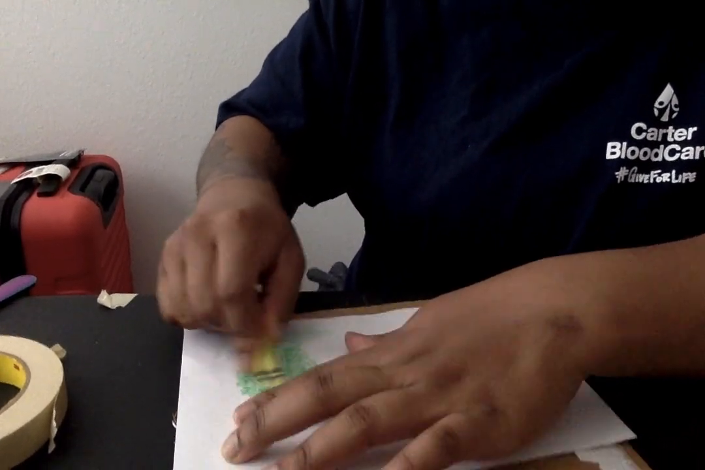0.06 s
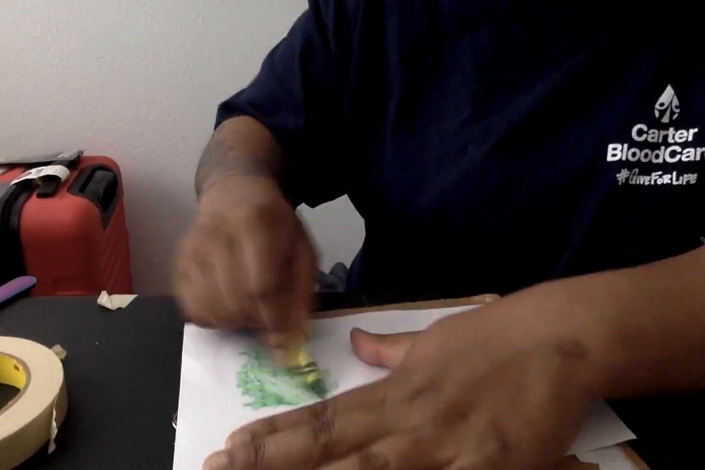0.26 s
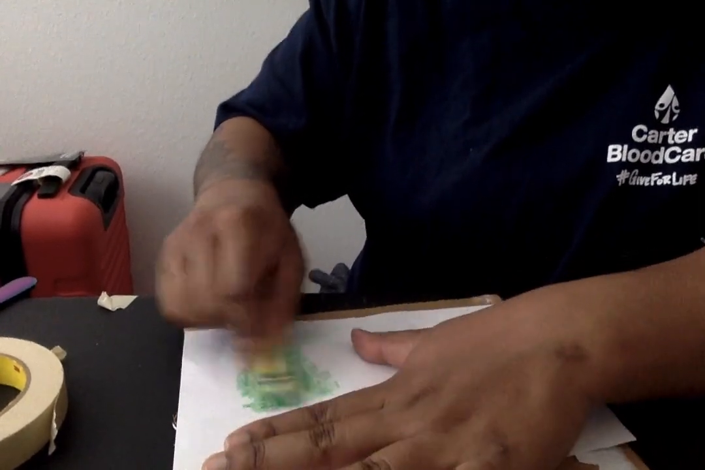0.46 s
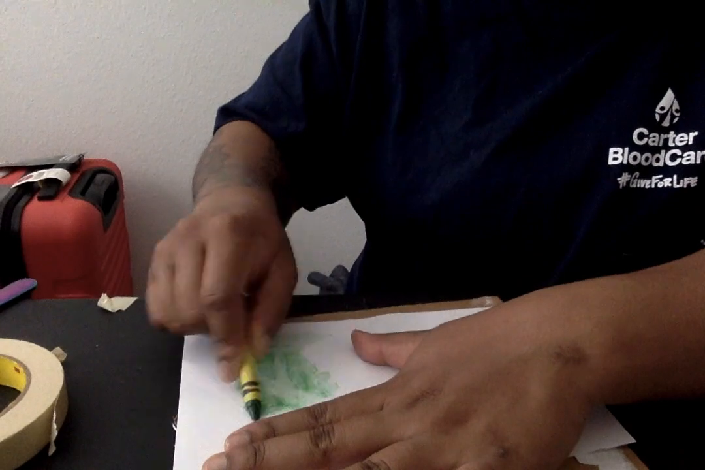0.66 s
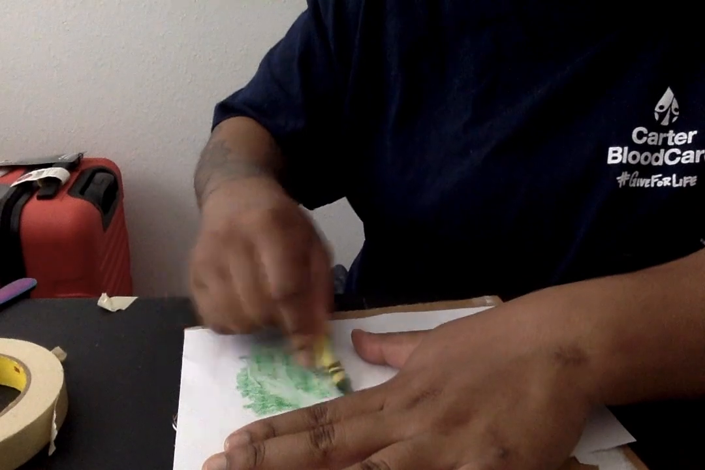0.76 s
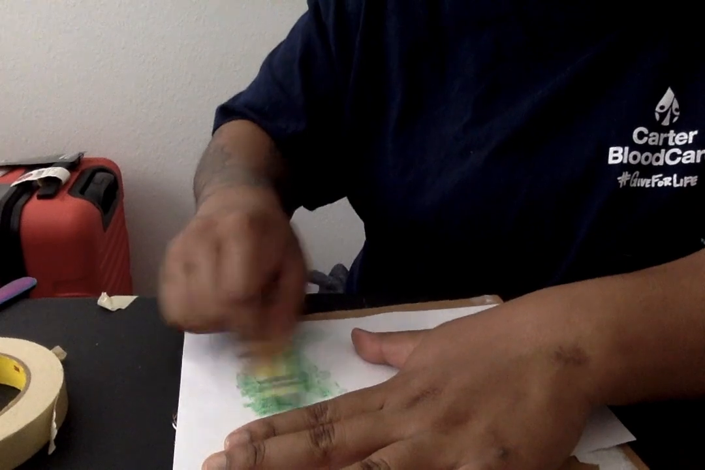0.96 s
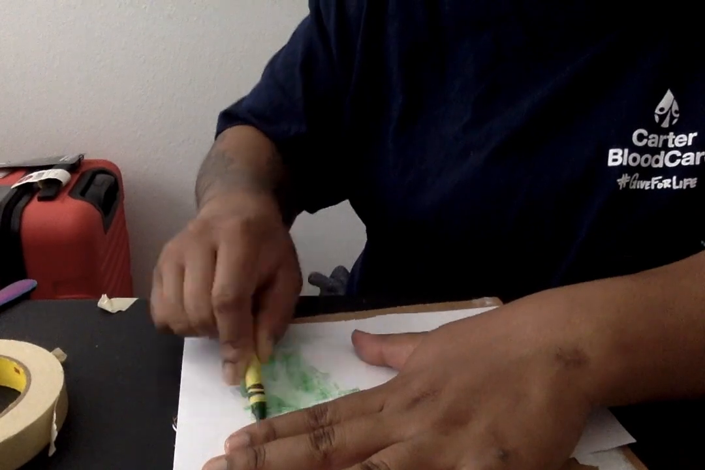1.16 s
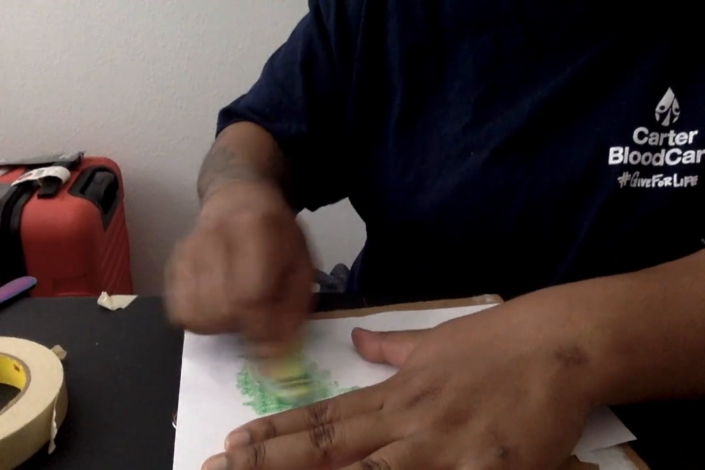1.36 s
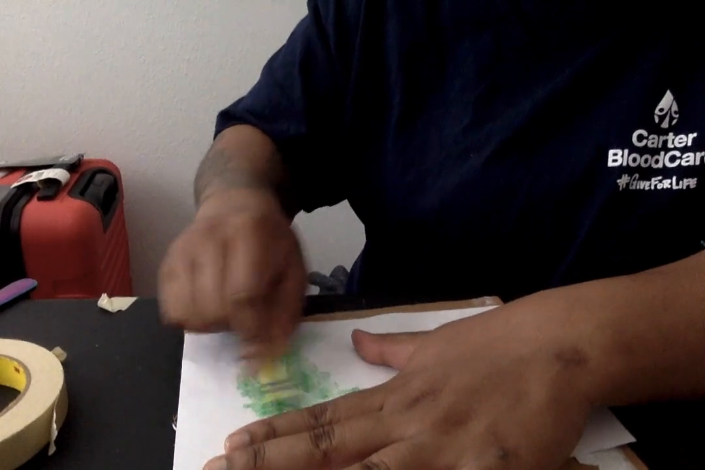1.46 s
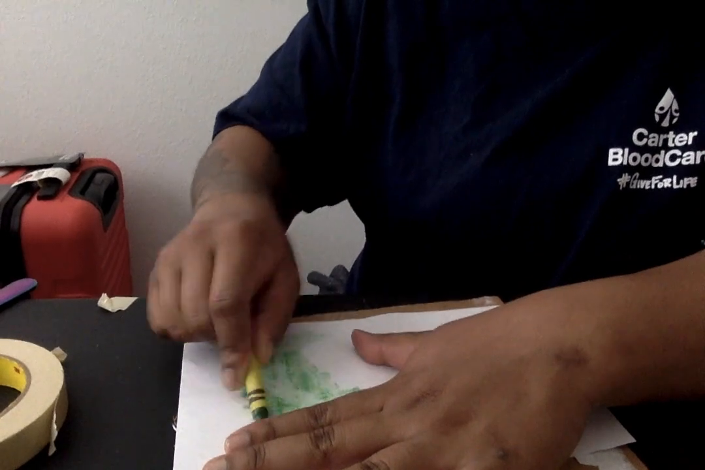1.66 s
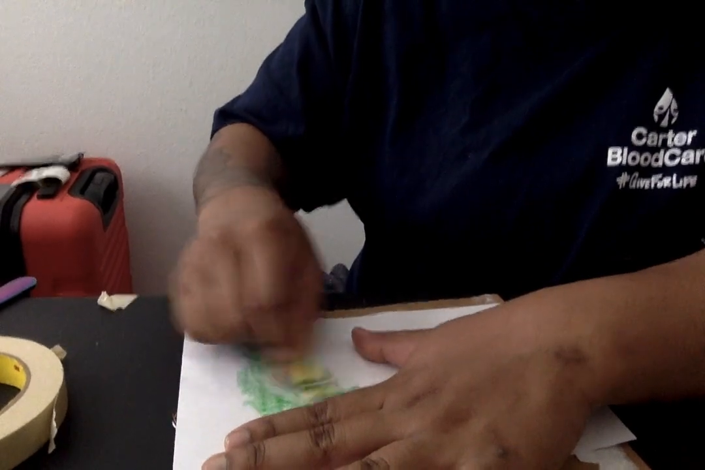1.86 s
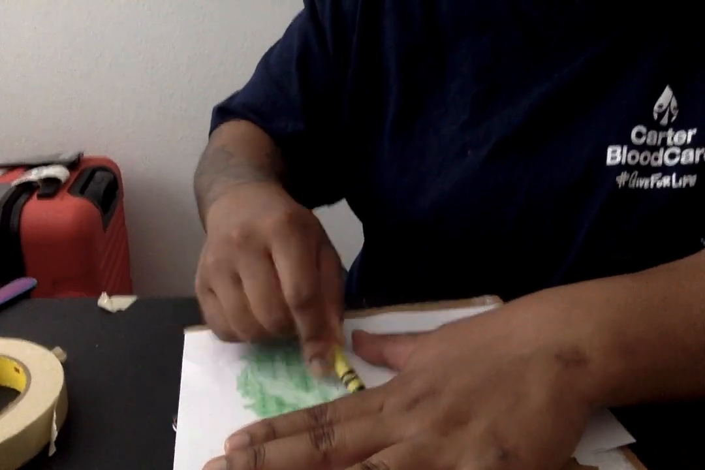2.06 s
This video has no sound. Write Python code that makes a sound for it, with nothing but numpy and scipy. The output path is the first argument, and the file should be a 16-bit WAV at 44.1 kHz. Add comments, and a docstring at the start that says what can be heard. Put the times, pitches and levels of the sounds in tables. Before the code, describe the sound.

A crayon scribbles rapidly on paper, close to the microphone in a small quiet room. First a hand slides over the sheet and lands with a soft thud, then scratchy strokes follow with hollow knocks and faint crackles.

```python
"""In a small quiet room, close to the microphone, a hand shifts over a sheet of paper and lands on the table.
A crayon then scribbles back and forth, eight strokes a second. Wax catches on the grain of the paper,
and this stick-slip friction hisses, rasps and makes the table rumble. The board under the sheet gives
hollow knocks as the pressure shifts, and the sheet crackles."""
import sys
import numpy as np
from scipy import signal
from scipy.fft import rfft, irfft
from scipy.io import wavfile
from scipy.ndimage import uniform_filter1d

SR = 44100
rng = np.random.default_rng(int(sys.argv[2]) if len(sys.argv) > 2 else 0)


def log_audio(samples):
    """Write samples as a 16-bit WAV file to the path given in sys.argv[1]."""
    # one column per channel
    frames = np.atleast_2d(samples).T
    # limit to full scale, then quantise
    limited = np.clip(frames, -1, 1)
    pcm = np.round(limited * 32767).astype(np.int16)
    wavfile.write(sys.argv[1], SR, pcm)


N = 92610
T = np.arange(N) / SR

# Crayon strokes, each lasting until the next turn: start_s, rasp_db, scrape_db
CRAYON_STROKES = [(0.336, -69.5, -69), (0.467, -72, -62), (0.585, -74.5, -67), (0.711, -71, -59),
                  (0.83, -77, -71), (0.97, -71, -54), (1.094, -70.5, -61.5), (1.224, -74, -55),
                  (1.348, -68, -67.5), (1.48, -65, -50.5), (1.603, -65.5, -54.5), (1.735, -69, -58.5),
                  (1.864, -73.5, -64), (1.991, -71.5, -60)]
# Knocks of the board on the table: start_s, note_db, pitch_hz, clack_db
BOARD_KNOCKS = [(0.194, -46, 234, -42), (.219, -30, 231.5, -31), (0.267, -42, 180, -46),
                (0.29, -43, 177, -79), (0.317, -49.5, 144, -110), (0.386, -40, 206.8, -42),
                (.412, -42, 171.5, -53), (0.519, -47.5, 135.5, -60.5), (.743, -48.5, 164, -54),
                (0.783, -47.5, 245, -54), (.865, -48.5, 240, -60), (0.919, -49.5, 164, -66),
                (1, -60, 255, -49), (1.027, -49, 270, -48.5), (1.048, -38.5, 230, -43.5),
                (1.131, -39, 158.6, -46), (1.176, -39, 168, -47), (1.257, -42, 239, -62),
                (1.295, -38.5, 191, -43), (1.382, -38, 172, -67), (1.422, -44.5, 174, -57),
                (1.507, -50, 249, -61), (1.527, -48, 259, -48), (1.548, -36.5, 197.6, -50),
                (1.637, -34.5, 185.4, -38.5), (1.684, -40.5, 167, -59), (1.801, -46, 234, -55.5),
                (1.951, -55, 173, -68.5), (2.029, -55.5, 237, -75), (2.042, -58, 255, -49)]
# Slides of the hand: start_s, peak_s, end_s, swish_db, rasp_db, scrape_db, rumble_db, swish_pitch_ratio
HAND_SLIDES = [(-.03, 0.026, 0.13, -59, -62, -80, -56, 1.07),
               (0.103, 0.14, 0.14, -66, -53, -44.5, -40.5, 1.07),
               (0.127, 0.157, 0.23, -80, -65.5, -58, -43, 0.96),
               (.208, 0.219, 0.287, -62.5, -64.5, -47, -45, 1),
               (.236, 0.288, 0.3217, -56, -62, -57, -45, 0.993)]
# Crackles of the sheet: start_s, level_db, pitch_hz, relative_treble_db
SHEET_CRACKLES = [(0.041, -48, 2100, -37), (0.1139, -42, 1940, -4), (.120, -47, 2550, -26),
                  (.386, -54, 2300, -13), (1.025, -59, 2280, -34), (1.277, -53, 2400, -35),
                  (1.303, -60, 2570, -20), (1.3846, -49.5, 2700, -23), (1.400, -52.5, 2500, -38),
                  (1.526, -48, 2780, -46), (1.628, -50, 2200, -37), (1.638, -52.5, 2700, -20),
                  (1.810, -52, 2600, -28), (1.826, -55.5, 2340, -44), (1.844, -64, 2400, -43),
                  (1.903, -59.5, 3300, -14), (2.066, -47, 2570, -45)]
# Modes of the board and table: frequency_hz, gain_db, t60_s
TABLE_MODES = [(138, -10, 0.59), (166, 0, 0.12), (210, -4, 0.024), (248.8, 5.5, 0.079), (302, -6.5, 0.12),
               (364.6, -4, 0.046), (497, -12.5, 0.051), (532, -9.5, 0.026), (705, -12.5, 0.032),
               (826, -8, 0.024), (926, -30, 0.034), (1252, -21, 0.051)]
# Modes of the sheet: frequency_hz, gain_db, t60_s
SHEET_MODES = [(2002, -1, 0.01), (2421, -5, 0.025), (2590, 7.5, 0.0032), (2975, -0.5, 0.011),
               (3530, -5, .014), (3927, 1.5, 0.013)]
# Spectrum of wax hissing on fine grain: frequency_hz, gain_db
HISS_SPECTRUM = [(500, -15), (2500, 13.5), (4500, 4.5), (6200, 4), (7300, -9.5), (10000, 1), (14500, -5),
                 (16000, -0.5)]
# Spectrum of the rasp on coarse grain: frequency_hz, gain_db
RASP_SPECTRUM = [(400, 1.5), (1400, -1.5), (1950, 6.5), (2500, 11.5), (3100, 1.5), (4000, 3.5), (4700, -12),
                 (8000, -18)]
# Spectrum of the board's hollow scrape: frequency_hz, gain_db
SCRAPE_SPECTRUM = [(150, -17), (330, -3.5), (530, 9.5), (700, -5.5), (900, -0.5), (1100, -3.5), (1400, -23),
                   (3000, -38)]
# Spectrum of the paper's high swish: frequency_hz, gain_db
SWISH_SPECTRUM = [(2000, -101), (4000, -2), (6000, -12.5), (8000, -13.5), (10600, -7.5), (12000, 4),
                  (15000, 2), (16500, -76)]
# Spectrum of the room's background noise: frequency_hz, gain_db
AIR_SPECTRUM = [(30, -82), (70, 16), (140, 0), (250, 4.5), (450, -32), (1500, -12), (2500, -10.5),
                (7000, -19), (15000, -21.5)]

SLIPS_PER_S, SLIP_SPREAD_DB = 1400, 7


def crayon(last_turn_s=2.135, hiss_db=-73, rumble_over_scrape_db=7):
    """Friction noise grows as a power of sliding speed, which falls to zero at every turn."""
    starts, rasp_db, scrape_db = np.array(CRAYON_STROKES).T
    progress = np.interp(T, np.append(starts, last_turn_s), np.arange(len(starts) + 1))
    phase = progress % 1
    speed = np.abs(np.sin(np.pi * phase ** 0.78))  # skewed to peak before mid-stroke
    bite = np.abs(np.sin(np.pi * phase ** 0.81))
    drag = speed ** 1.61
    midpoints = np.arange(len(starts)) + .5
    rasp = undb(np.interp(progress, midpoints, rasp_db))
    scrape = undb(np.interp(progress, midpoints, scrape_db))
    rumble = undb(rumble_over_scrape_db) * scrape * drag
    return friction(HISS_SPECTRUM, undb(hiss_db) * drag, rasp * speed ** 2.3, scrape * bite ** 2.3, rumble)


def friction(hiss_spectrum, hiss, rasp, scrape, rumble):
    """Stick-slip friction: fine grains hiss, coarse ones rasp, and slips drive the board and table."""
    fine = moving_contact(colour(catches(per_s=5800, spread_db=2), hiss_spectrum))
    coarse = moving_contact(colour(catches(per_s=550, spread_db=2), RASP_SPECTRUM))
    slips = catches(SLIPS_PER_S, SLIP_SPREAD_DB)
    board = moving_contact(colour(slips, SCRAPE_SPECTRUM))
    table = unit(ring(slips, TABLE_MODES))
    return hiss * fine + rasp * coarse + scrape * board + rumble * table


def catches(per_s, spread_db):
    """Shot noise: tiny independent catches form a train of impulses of random sign and strength."""
    strength = np.minimum(rng.exponential(size=N), 2.5)
    caught = rng.random(N) < per_s / SR
    return unit(caught * rng.choice([-1, 1], N) * undb(spread_db * strength))


def moving_contact(x, depth_db=2.6, width_hz=260, span_s=.03):
    """A time-varying filter: the sheet's resonances shift as the point of contact travels over it."""
    size, hop = 512, 128
    _, _, spectra = signal.stft(x, nperseg=size, noverlap=size - hop)
    ripple = rng.standard_normal(spectra.shape)
    ripple = uniform_filter1d(ripple, round(width_hz * size / SR), axis=0)
    ripple = uniform_filter1d(ripple, round(span_s * SR / hop), axis=1)
    _, shifted = signal.istft(spectra * undb(depth_db * unit(ripple)), nperseg=size, noverlap=size - hop)
    return unit(shifted[:N])


def knocks(flex_lead_s=0.001975, shortest_contact_s=0.00047, hardening=0.24):
    """Hertzian impact: the board flexes, then hits the table; weak contacts last longer and are duller."""
    out, t = np.zeros(N), T[:SR // 5]
    low_cut = signal.butter(3, 246, "high", fs=SR, output="sos")
    hardest_db = max(row[3] for row in BOARD_KNOCKS)
    for start, note_db, hz, clack_db in BOARD_KNOCKS:
        contact_s = shortest_contact_s / undb(clack_db - hardest_db) ** hardening
        age = t / contact_s
        force = signal.sosfilt(low_cut, age ** 2 * np.exp(-2 * age))
        add(out, start - flex_lead_s, burst(board_flex(hz, swell_s=0.005), note_db))
        add(out, start, burst(ring(np.gradient(force), TABLE_MODES), clack_db))
    return out


def board_flex(hz, swell_s, overtone_ratio=1.836, overtone_db=-11, overtone_swell_s=0.0037):
    """Damped bending: a hollow note, set by where the board is pressed, and its overtone swell and die."""
    def partial(frequency, peak_s):
        return np.sin(2 * np.pi * frequency * T) * T / peak_s * np.exp(-T / peak_s)
    return partial(hz, swell_s) + undb(overtone_db) * partial(hz * overtone_ratio, overtone_swell_s)


def hand(landing_s=.114, thud_db=-29.5):
    """Sliding friction makes the hand swish; its soft landing bends the board in a low thud."""
    out = np.zeros(N)
    for start, peak, end, *levels_db, pitch_ratio in HAND_SLIDES:
        spectrum = [(hz * pitch_ratio, db) for hz, db in SWISH_SPECTRUM]
        envelope = np.interp(T, [start, peak, end], [0, 1, 0])
        swish, rasp, scrape, rumble = (undb(db) * envelope for db in levels_db)
        out += friction(spectrum, swish, rasp, scrape, rumble)
    add(out, landing_s, burst(board_flex(hz=137, swell_s=.013), thud_db))
    return out


def crackles(half_band_octaves=0.37, snap_s=.0012, crinkle_s=0.02, crinkle_db=-13):
    """Impulsive excitation: each snap and its brief crinkle ring the sheet's modes around one pitch."""
    out, t = np.zeros(N), T[:SR // 10]
    edge_ratio = 2 ** half_band_octaves
    for start, db, hz, treble_db in SHEET_CRACKLES:
        band = signal.butter(2, [hz / edge_ratio, hz * edge_ratio], "band", fs=SR, output="sos")
        snap = rng.standard_normal(len(t)) * np.exp(-t / snap_s)
        slips = catches(SLIPS_PER_S, SLIP_SPREAD_DB)[:len(t)]
        crinkle = undb(crinkle_db) * np.exp(-t / crinkle_s) * slips
        body = signal.sosfilt(band, ring(snap + crinkle, SHEET_MODES))
        treble = colour(np.pad(snap, (0, len(t))), SWISH_SPECTRUM)[:len(t)]
        add(out, start, burst(body, db) + burst(treble, db + treble_db))
    return out


def ring(force, modes, scatter_db=2.5):
    """Modal superposition: a force drives damped sinusoids whose weights vary from contact to contact."""
    t = T[:SR // 5]
    weights = undb(scatter_db * rng.standard_normal(len(modes)))
    response = sum(weight * undb(db) * np.sin(2 * np.pi * hz * t) * np.exp(-np.log(1000) * t / t60)
                   for weight, (hz, db, t60) in zip(weights, modes))
    return signal.fftconvolve(force, response)[:len(force)]


def reverberation(direct, t60_s=.2, delay_s=.005, cutoff_hz=5150):
    """Diffuse reflections decay exponentially, and the walls absorb the treble."""
    t = T[:SR // 2]
    response = rng.standard_normal(len(t)) * np.exp(-np.log(1000) * t / t60_s) * (t > delay_s)
    reflected = signal.fftconvolve(direct, response / np.linalg.norm(response))[:N]
    return signal.sosfilt(signal.butter(2, cutoff_hz, fs=SR, output="sos"), reflected)


def room_air():
    """Stationary noise, strongest in the bass, forms the room's background."""
    return unit(colour(rng.standard_normal(N), AIR_SPECTRUM))


def undb(db):
    """Convert decibels to an amplitude ratio."""
    return 10 ** (np.asarray(db) / 20)


def unit(x):
    """Scale to an RMS of one."""
    return x / np.sqrt(np.mean(x ** 2))


def burst(x, db):
    """Scale a short sound so that its loudest 6 ms have this RMS level."""
    return x * undb(db) / np.sqrt(uniform_filter1d(x ** 2, size=260).max())


def add(out, start_s, x):
    """Superpose x on out from a given time."""
    i = max(int(start_s * SR), 0)
    out[i:i + len(x)] += x[:max(N - i, 0)]


def colour(x, spectrum):
    """Filter by a gain curve interpolated over log frequency."""
    hz, db = np.array(spectrum).T
    bins_hz = np.maximum(np.fft.rfftfreq(len(x), 1 / SR), 1)
    gain = undb(np.interp(np.log(bins_hz), np.log(hz), db))
    return irfft(rfft(x) * gain, len(x))


def scene(reverb_gain_db=-13.5, air_db=-77.5):
    """Linear superposition: direct sound, reflections and background add in one channel."""
    direct = crayon() + hand() + knocks() + crackles()
    return (direct + undb(reverb_gain_db) * reverberation(direct) + undb(air_db) * room_air())[None]


def record(dry, low_hz=66, top_hz=15900):
    """Band limiting: the microphone thins the deep bass and cuts the highest treble."""
    thinned = signal.sosfilt(signal.butter(4, low_hz, "high", fs=SR, output="sos"), dry)
    return signal.sosfilt(signal.ellip(8, .2, 70, top_hz, fs=SR, output="sos"), thinned)


dry = scene()
out = record(dry)
log_audio(out)
```